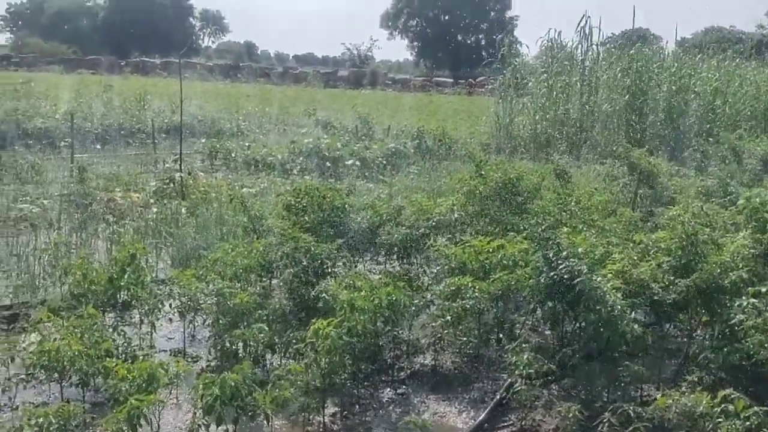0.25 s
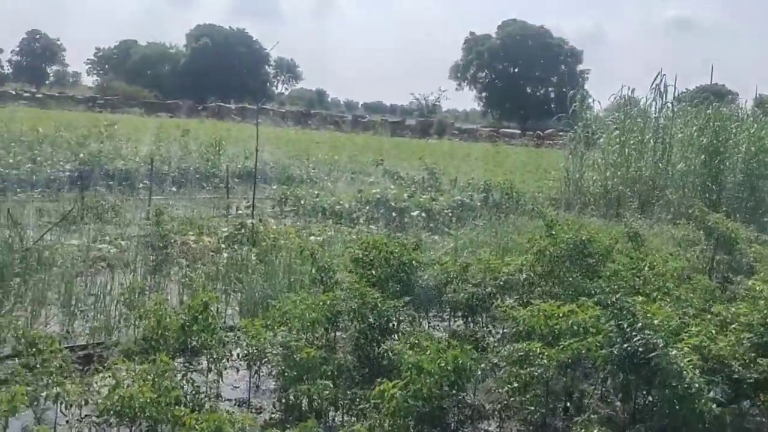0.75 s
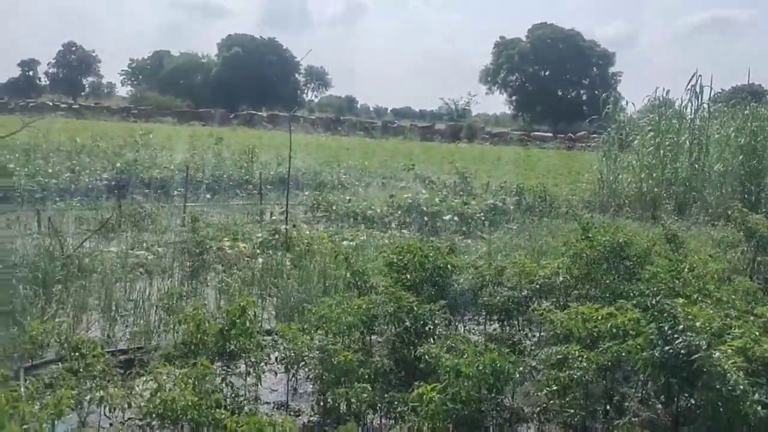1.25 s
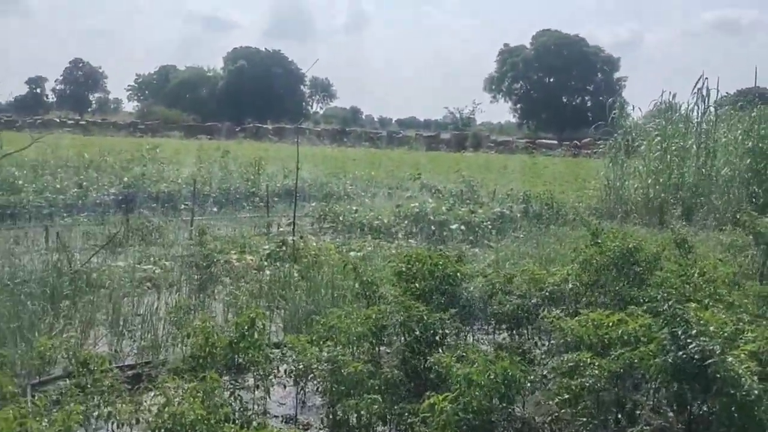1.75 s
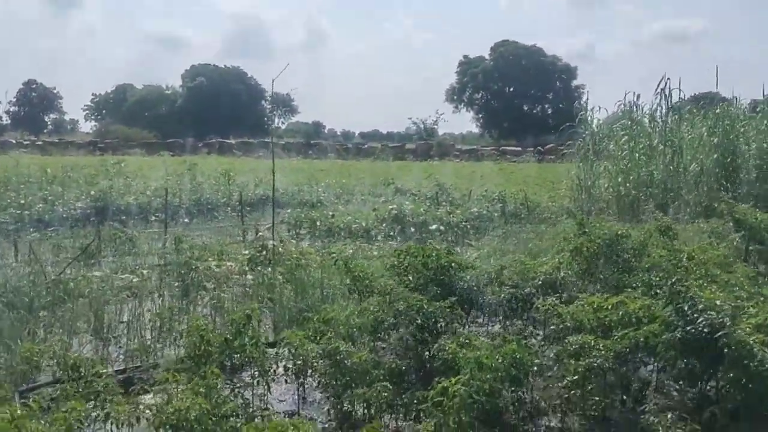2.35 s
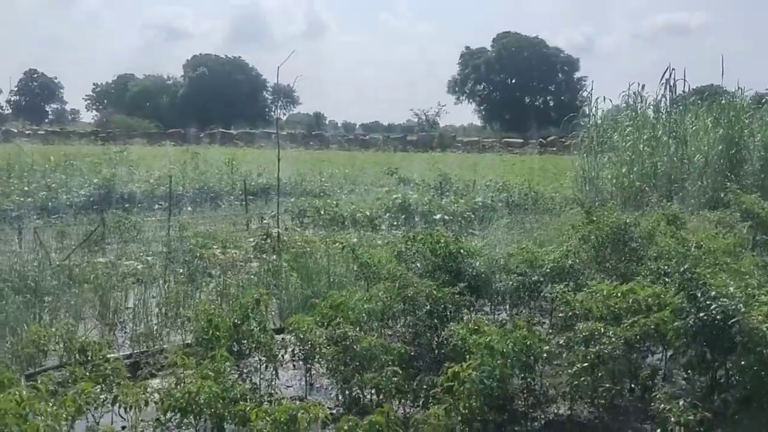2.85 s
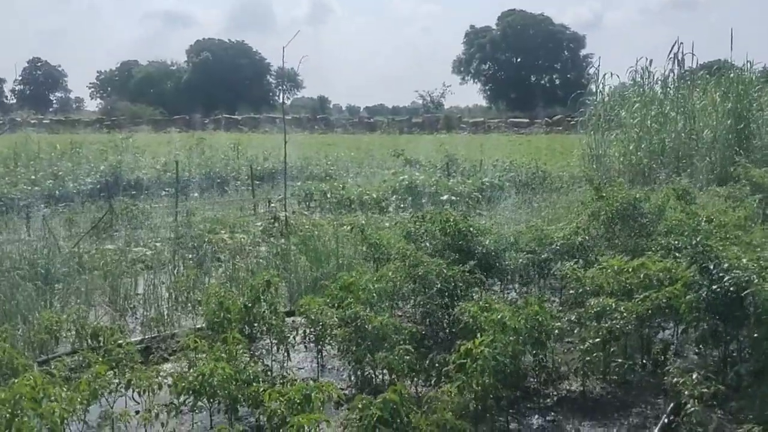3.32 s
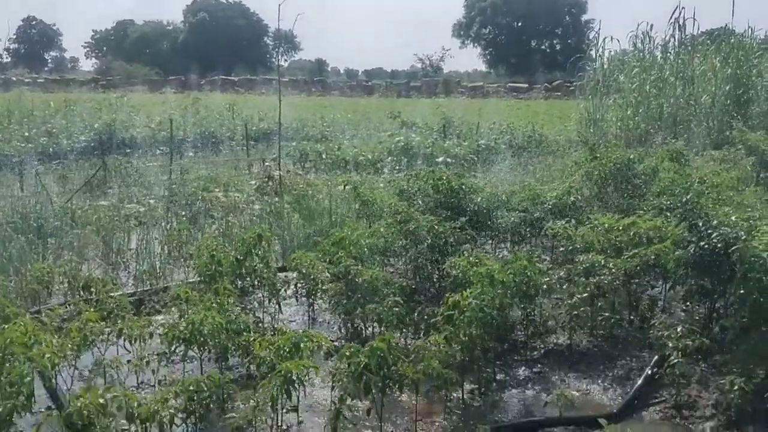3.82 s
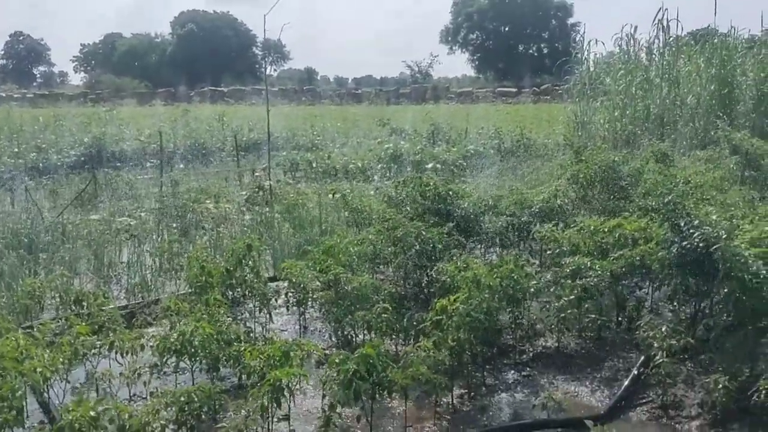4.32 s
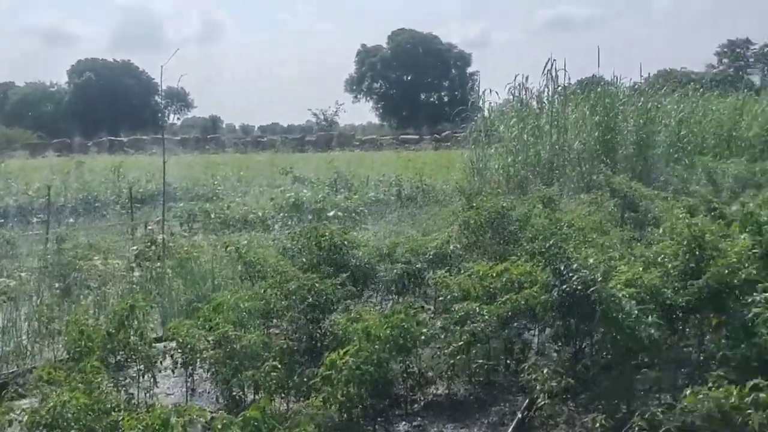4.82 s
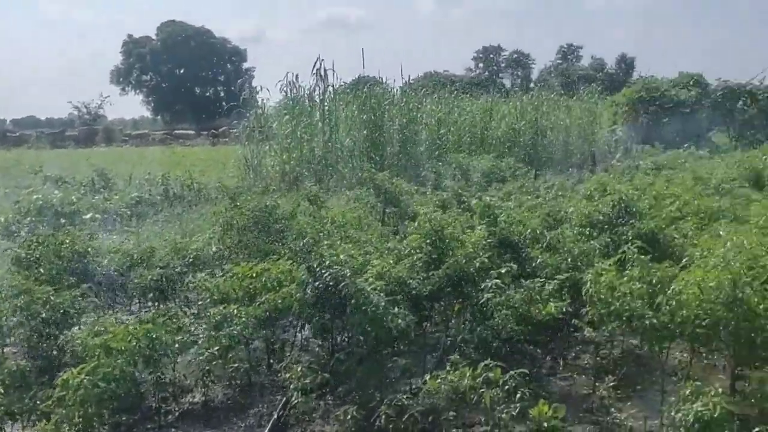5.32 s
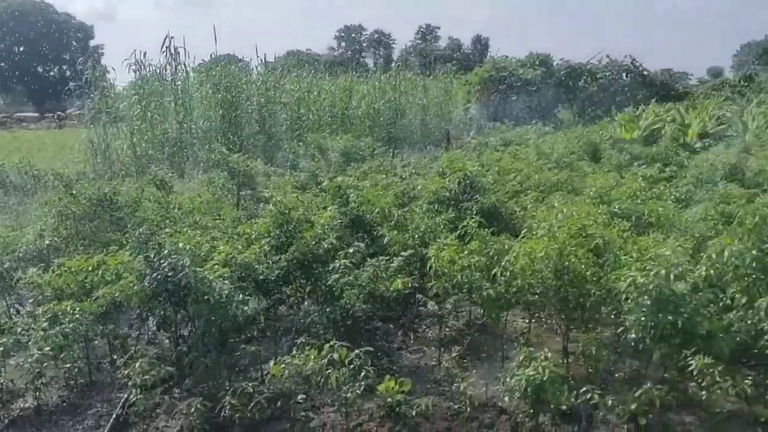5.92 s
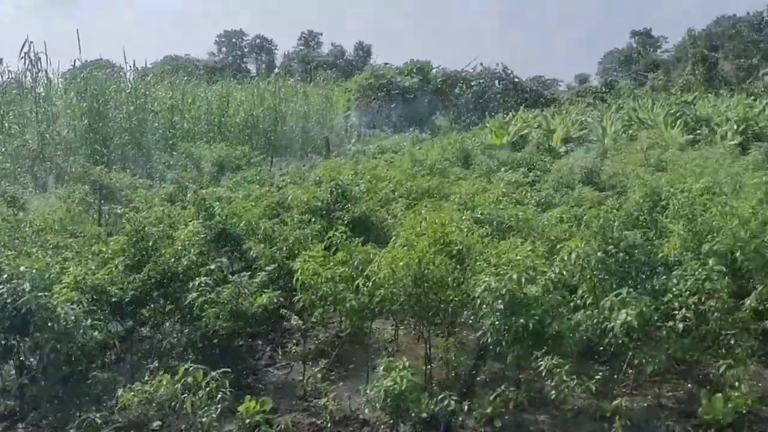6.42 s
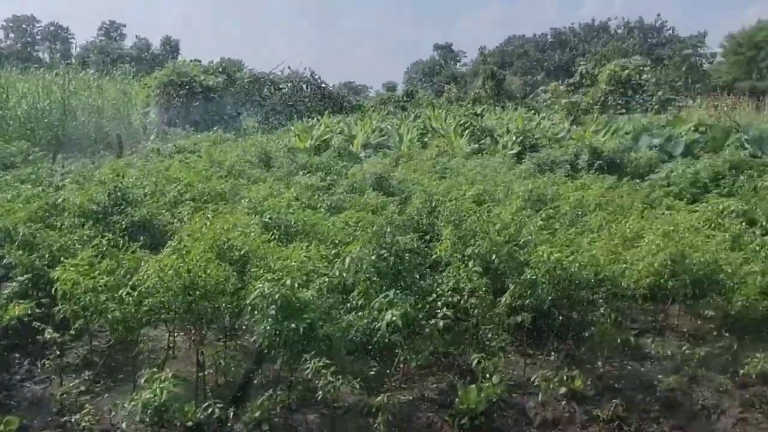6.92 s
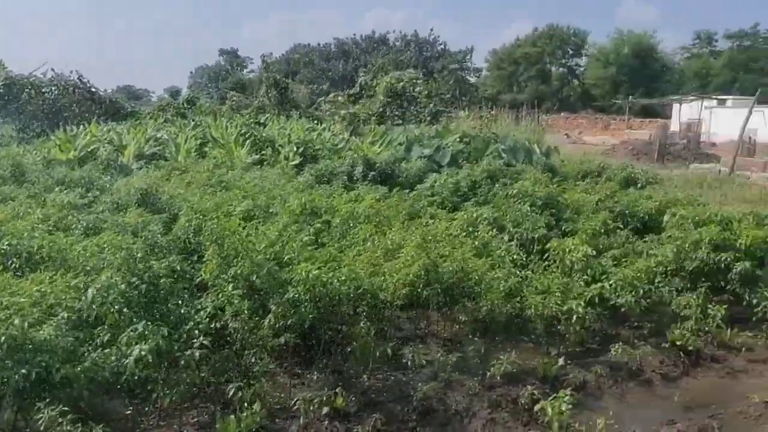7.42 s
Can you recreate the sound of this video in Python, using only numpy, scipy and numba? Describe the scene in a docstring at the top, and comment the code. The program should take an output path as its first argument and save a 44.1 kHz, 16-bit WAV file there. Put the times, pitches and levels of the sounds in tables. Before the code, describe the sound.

Water trickles, gurgles and splashes among plants in a flooded field while dull soft knocks bump the hand-held phone.

```python
"""Splashes stand out at once over water that trickles between the plants of a flooded field, on a hand-held phone.
Drops and bubbles ring pockets in the water and mud that keep opening and closing; they are swarms of fading sines
and noise cracks through drifting resonances. Each splash churns the water, which settles again.
Dull pushes knock the phone; as it turns, a fine spray of tiny pings on the leaves comes forward.
Far under the water lie a wavering low rumble, a faint hiss and the microphone's own hiss."""
import sys
import numpy as np
from scipy import signal
from scipy.fft import rfft, irfft
from scipy.io import wavfile
from scipy.ndimage import uniform_filter1d
from numba import njit

SR = 44100
rng = np.random.default_rng(int(sys.argv[2]) if len(sys.argv) > 2 else 0)


def file_out(sig):
    """Save sig as 16-bit WAV at sys.argv[1]."""
    # one column per channel
    cols = np.atleast_2d(sig).T
    # limit, then scale
    lim = np.clip(cols, -1, 1)
    pcm = np.round(lim * 32767).astype(np.int16)
    wavfile.write(sys.argv[1], SR, pcm)


N = 337806
TIME = np.arange(N) / SR

# Levels in the tables are relative: each source adds its own trim, and the phone shapes the sum.

# The calm flow between splashes. Each row: time in seconds, levels of gurgle, trickle and patter in dB.
FLOW = [(0.0, -67.5, -59, -59.5), (0.51, -66.5, -60, -59.5), (1.04, -72, -66, -55.5),
        (1.36, -66, -69.5, -57.5), (1.85, -67.5, -54.5, -53.5), (2.13, -60, -61.5, -62),
        (2.54, -72.5, -77, -62), (2.98, -76, -60, -72), (3.6, -63.5, -62.5, -72), (3.8, -61, -54.5, -58),
        (4.05, -70.5, -57.5, -69.5), (4.54, -63.5, -51.5, -60.5), (5.27, -80, -70, -49),
        (5.63, -68.5, -62.5, -59), (6.16, -67, -54, -49), (6.85, -74, -64.5, -57.5),
        (7.15, -65.5, -46.5, -50.5), (7.66, -99, -54, -44.5)]
# Resonant pockets of the deep gurgle. Each row: centre in Hz, width of each of two passes in Hz, level in dB.
GURGLE_POCKETS = [(471.6, 246, 5.5), (821, 400, -1.5)]
# Resonant pockets of the trickle. Each row: centre in Hz, width of each of two passes in Hz, level in dB.
TRICKLE_POCKETS = [(1139, 267, -5), (1553, 263, 2.5), (1983, 644, 2.5)]
# Resonant pockets of the patter. Each row: centre in Hz, width of each of two passes in Hz, level in dB.
PATTER_POCKETS = [(2522, 234, -5), (2924, 270, 1.5), (3422, 170, 1), (3860, 280, -2.5), (4276, 273, -4)]
# Finest drops of the patter. Each row: time in seconds, level in dB.
FIZZ = [(0.0, -55), (0.3, -65), (0.65, -82), (1.8, -77.5), (2.5, -83), (4.3, -83), (5.3, -73), (5.6, -69),
        (6.1, -76), (6.55, -65), (6.7, -47), (7.15, -70), (7.66, -67)]
# Splashes. Each row: start in seconds, level in dB, pitch of the main bubble in Hz,
# wash after it in dB relative to that level.
SPLASHES = [(0.049, -34, 4540, -40), (0.0905, -32, 4190, -14.5), (0.183, -31.5, 1724, -10.5),
            (0.3528, -36, 2810, -12), (0.5202, -33, 1330, -40), (0.6214, -44.5, 1470, -5.5),
            (0.7931, -34, 4000, -16), (0.9194, -32, 2920, -14), (0.9476, -31, 3850, -15.5),
            (1.5008, -29.5, 1470, -16), (1.7487, -35.5, 1395, -17.5), (1.825, -32.5, 3080, -22),
            (1.866, -37, 1054, -20), (1.906, -37, 1740, -16.5), (1.9285, -32.5, 3000, -16.5),
            (1.988, -34.5, 1270, -22), (2.0035, -37, 1265, -23), (2.2756, -39.5, 1820, -8.5),
            (2.5553, -37, 1020, -14.5), (2.7065, -34, 1010, -12.5), (2.7204, -36, 3210, -24),
            (2.827, -37.5, 3300, -28), (2.831, -26.5, 1515, -22), (2.8484, -25.5, 1093, -16.5),
            (2.8856, -35.5, 1450, -16), (3.03, -38.5, 1540, -13), (3.1676, -31, 1510, -23),
            (3.169, -41, 3130, -21), (3.272, -27.5, 1500, -13.5), (3.3, -50, 2550, -2.5),
            (3.375, -35.5, 1144, -16), (3.598, -32.5, 1066, -9), (3.6146, -29, 1760, -16),
            (3.6719, -37.5, 2080, -5.5), (3.6746, -39.5, 4360, -16), (3.712, -36.5, 2070, -30),
            (3.8704, -33.5, 1445, -19), (3.9315, -31, 4110, -18), (4.115, -37.5, 1500, -8),
            (4.1403, -31.5, 1840, -24), (4.1932, -29.5, 1420, -16), (4.215, -39, 3030, -13.5),
            (4.2625, -32, 1080, -14.5), (4.4212, -34, 2016, -9.5), (4.4643, -29, 1445, -26),
            (4.468, -40, 3460, -23), (4.509, -29.5, 820, -39), (4.5524, -42.5, 1690, 0),
            (4.6235, -31, 1934, -7.5), (4.627, -42, 3400, -23), (4.6826, -31, 1960, -14),
            (4.7517, -30, 2100, -19), (4.8276, -35, 2700, -17), (4.8845, -38.5, 2750, -36),
            (4.9551, -27.5, 2060, -20.5), (5.0335, -35.5, 2580, -10.5), (5.1215, -35, 918, -3.5),
            (5.1817, -29.5, 3380, -11), (5.2815, -32, 2250, -19.5), (5.285, -31.5, 3960, -20),
            (5.44, -36, 3140, -8), (5.5747, -31.5, 933, -13.5), (5.696, -31.5, 1370, -20.5),
            (5.796, -25.5, 3330, -11), (5.8286, -26.5, 3560, -27), (5.8602, -29.5, 3170, -21),
            (5.909, -33, 3080, -17), (6.058, -30, 1336, -16), (6.0771, -29, 2570, -16),
            (6.113, -29.5, 2120, -20), (6.224, -33, 1380, -29), (6.3031, -29.5, 2460, -7.5),
            (6.6208, -22.5, 4240, -17), (6.636, -37, 1250, -19), (6.6907, -30, 4420, -8.5),
            (6.88, -33, 4520, -13), (6.978, -30, 1670, -16.5), (7.092, -33.5, 1830, -15.5),
            (7.224, -34.5, 1470, -21), (7.3317, -21.5, 1114, -17.5), (7.345, -30, 2440, -6.5),
            (7.3996, -31, 1870, -17), (7.4475, -33, 1910, -14.5), (7.4958, -34, 990, -8.5),
            (7.5672, -27.5, 2440, -19.5)]
# Big bubbles. Each row: start in seconds, level in dB, pitch at the start in Hz.
PLOPS = [(1.318, -44, 398), (1.542, -47, 450), (1.835, -45, 424), (2.004, -45.5, 433), (2.083, -49, 410),
         (2.549, -46.5, 400), (2.913, -39.5, 460), (3.143, -45, 390), (4.129, -45.5, 494),
         (4.553, -38, 585), (4.85, -43, 350), (4.944, -39.5, 420), (5.124, -33.5, 483), (2.978, -47, 386),
         (3.158, -50, 398), (3.196, -48.5, 465), (5.578, -48, 497), (5.931, -50.5, 420), (6.007, -48, 410),
         (6.491, -43, 546), (6.967, -41, 410), (7.079, -51.5, 303), (7.185, -50.5, 420),
         (7.373, -48.5, 412), (7.399, -40, 386), (7.524, -45.5, 492)]
# Single drops striking leaves. Each row: start in seconds, level in dB, nominal pitch in Hz.
LEAF_TICKS = [(0.215, -57, 9500), (1.043, -56, 9050), (1.591, -57, 8750), (1.825, -52.5, 10500),
              (2.0587, -44.5, 10200), (2.104, -53, 9900), (4.747, -31, 12100), (4.797, -39, 10900),
              (4.946, -39, 11200), (5.036, -37, 11200), (5.723, -39.5, 10700), (5.794, -45, 10500),
              (5.843, -43, 9300), (6.078, -54, 11800), (6.6204, -44.5, 10000)]
# Tiny bright bubbles. Each row: start in seconds, level in dB, pitch in Hz.
PLINKS = [(1.3254, -64, 5110), (1.7569, -66, 4900), (2.2248, -65.5, 5380), (3.2849, -73, 4830),
          (4.122, -62.5, 5160), (5.284, -52, 4840), (5.591, -62.5, 4880), (5.8444, -54, 4800),
          (6.3021, -56.5, 5030), (6.624, -46, 4350)]
# Fine spray on the leaves, forward as the phone turns. Each row: time in seconds, level in dB,
# centre in Hz, level of its highest sizzle in dB.
SPRAY = [(0, -81, 8980, -90), (0.27, -86, 9360, -93), (0.38, -87.5, 10070, -100), (3.9, -99, 9920, -100),
         (4.35, -85, 10600, -88), (4.62, -74, 11400, -64), (4.72, -72, 10400, -79),
         (4.85, -69.5, 10730, -85), (5.19, -66.5, 11180, -76), (5.33, -69.5, 10600, -83),
         (5.52, -68, 10500, -59), (5.65, -77.5, 11300, -70), (6.04, -66, 11340, -84),
         (6.2, -71, 11700, -73), (6.53, -76, 10820, -87), (6.68, -78, 10200, -66.5),
         (7.35, -68.5, 10260, -71.5), (7.66, -73.5, 10260, -72)]
# Dull knocks on the phone. Each row: start in seconds, level in dB, nominal pitch in Hz.
KNOCKS = [(0.308, -32, 175), (0.361, -32.5, 106), (0.387, -25.5, 129), (0.457, -15.5, 159),
          (0.501, -24.5, 152), (0.629, -29, 107), (0.659, -26, 104), (1.429, -36.5, 162),
          (1.47, -38.5, 135), (1.575, -39, 149), (1.664, -36.5, 149), (2.164, -33.5, 250),
          (2.28, -26.5, 161), (2.368, -25, 140), (2.458, -40, 87), (3.737, -36.5, 128), (3.806, -21, 169),
          (3.953, -33, 133), (4.398, -13, 173), (4.5, -22, 165), (4.513, -28, 101), (4.537, -31, 172),
          (4.847, -38, 143), (5.141, -12.5, 175), (5.154, -27.5, 250), (5.172, -28, 134), (6.074, -41, 133),
          (6.979, -33, 212), (7.551, -33, 302)]
# Low rumble of air and hand. Each row: time in seconds, level in dB.
RUMBLE = [(0.0, -86), (0.53, -78), (1.0, -90), (1.19, -84), (1.54, -74), (1.92, -81), (2.35, -69),
          (2.69, -90), (3.41, -88), (3.75, -71.5), (4.1, -85.5), (5.16, -80.5), (5.7, -90), (7.66, -82)]
# Colour of the steady background. Each row: frequency in Hz, relative level in dB.
HISS_COLOUR = [(25, -29.5), (150, -8.5), (420, 16), (750, -3), (1600, 9), (2500, 5.5), (3400, 3),
               (3800, -9), (4400, -4.5), (5200, -14.5), (10000, -22.5), (15500, -13)]
# Microphone response, with a deep hollow in the treble. Each row: frequency in Hz, gain in dB.
MIC = [(20, 7), (4400, -5), (5000, 1), (5800, -2), (6500, -1), (7200, -13), (8200, -3.5), (9400, -1.5),
       (11000, -2)]
# Colour of the microphone's own even hiss. Each row: frequency in Hz, relative level in dB.
MIC_HISS = [(100, -17), (4400, -0.5), (6000, -20), (7800, -10), (10000, -2), (12400, 3.5), (15500, -3.5)]

# a splash churns the water at once, mostly near its own pitch, and the water settles again
CHURN_RISE_S, SETTLE_S, CHURN_OCTAVES = 0.001, 0.066, 0.52
# the water keeps reshaping each pocket: shift as a share of its pitch, and how often
POCKET_SHIFT, RESHAPES_PER_S = 0.048, 8
SPRAY_FOLLOWS = 0.07  # share of the patter's surge, in dB, that the spray follows
LEAD_S = 0.012  # time that a splash or tick has to swell before its peak
TOP_HZ = 15550  # the phone cuts the treble above this


def running_water(sway_db=6.5, open_db=-18):
    """Deep gurgle, trickling bubbles and pattering drops ring the pockets and surge after each splash."""
    gurgle = bubbles(264.2, 935, cycles=1.064, spread_db=15, count=1400)
    gurgle = scatter(gurgle, tail_s=0.14, wet_db=-5.5)

    spits = unit(band(drops(contact_s=0.0049, spread_db=17.5, count=520), 974, 1950, order=4))
    trickle = bubbles(882.4, 2282, cycles=2.5, spread_db=25, count=1700) + undb(-0.5) * spits
    trickle = scatter(trickle, tail_s=0.11, wet_db=-0.5)

    slaps = unit(band(drops(contact_s=0.0035, spread_db=15, count=800), 2200, 4500, order=6))
    patter = slaps + undb(-2.5) * bubbles(2295.4, 4587, cycles=8, spread_db=17.5, count=1400)
    patter = scatter(patter, tail_s=0.22, wet_db=-3.5)

    # a little of each sound also reaches the microphone without ringing a pocket
    gurgle = pockets(gurgle, GURGLE_POCKETS, sway_db) + undb(open_db) * gurgle
    trickle = pockets(trickle, TRICKLE_POCKETS, sway_db) + undb(open_db) * trickle
    patter = pockets(patter, PATTER_POCKETS, sway_db) + undb(open_db) * patter

    gurgle_db = surge(curve(FLOW, axis=1), PLOPS, centre_hz=474, flow_db=5.5, churn_db=-13.5)
    trickle_db = surge(curve(FLOW, axis=2), wash_events(), centre_hz=1433, flow_db=-3.0, churn_db=-4.5)
    return stream(gurgle, gurgle_db) + stream(trickle, trickle_db) + stream(patter, patter_level())


def bubbles(low_hz, high_hz, cycles, spread_db, count):
    """A swarm of short-lived bubbles at random moments, most of them weak; each fades over a few cycles."""
    out = np.zeros(N)
    for when, size, strength, life in rng.random((count, 4)):
        hz = low_hz * (high_hz / low_hz) ** size
        fall_s = cycles / hz * 2 ** (2 * life - 1)
        t = np.arange(-3 * fall_s, 6 * fall_s, 1 / SR)
        ring = swell(t, fall_s / 2, fall_s) * np.sin(2 * np.pi * hz * t)
        add(out, when * N / SR, undb(spread_db * strength ** 3) * ring)
    return unit(out)


def drops(contact_s, spread_db, count):
    """Drops land at random moments, each a brief crack of noise, most of them weak."""
    power = np.zeros(N)
    when, strength = rng.random((count, 2)).T
    np.add.at(power, (when * N).astype(int), undb(spread_db * strength ** 3) ** 2)
    # two equal decays in a row round off each crack's start
    keep = np.exp(-2 / (contact_s * SR))
    for _ in range(2):
        power = signal.lfilter([1], [1, -keep], power)
    return unit(np.sqrt(power) * rng.standard_normal(N))


def pockets(x, modes, sway_db, rate=9):
    """Hollows ring with what falls in; each holds its pitch until reshaped, and opens and closes on its own."""
    out = np.zeros(N)
    for hz, width, db in modes:
        centre = hz * (1 + POCKET_SHIFT * held(RESHAPES_PER_S))
        once = resonate(x, centre, float(width))
        twice = resonate(once, centre, float(width))
        out += twice * undb(db + sway_db * walk(rate))
    return out


@njit
def resonate(x, hz, width):
    """State-variable band-pass with a moving centre, gain 1 there."""
    out, mid, low = np.empty(len(x)), 0., 0.
    for i in range(len(x)):
        g = np.tan(np.pi * hz[i] / SR)
        damping = np.pi * width / SR * (g + 1 / g)
        v = (mid + g * (x[i] + 1e-18 - low)) / (1 + g * (g + damping))
        mid = 2 * v - mid
        low = low + 2 * g * v
        out[i] = damping * v
    return out


def wash_events():
    """The wash of each splash as (s, dB, Hz)."""
    return [(s, db + wash_db, hz) for s, db, hz, wash_db in SPLASHES]


def patter_level():
    """Level in dB of the patter, surging with the washes."""
    return surge(curve(FLOW, axis=3), wash_events(), centre_hz=2920, flow_db=-5.0, churn_db=-8.0)


def surge(calm_db, events, centre_hz, flow_db, churn_db):
    """Level in dB of one part of the water: the calm flow plus what the events churn up."""
    calm_power = undb(calm_db + flow_db) ** 2
    churn_power = undb(churn_db) ** 2 * churn(events, centre_hz)
    return 10 * np.log10(calm_power + churn_power)


def churn(events, centre_hz):
    """Power that (s, dB, Hz) events stir up in the part of the water that sounds around centre_hz."""
    power = np.zeros(N)
    t = TIME[:SR // 2]
    envelope = (1 - np.exp(-t / CHURN_RISE_S)) * np.exp(-t / SETTLE_S)
    for s, db, hz in events:
        nearness = np.exp(-(np.log2(hz / centre_hz) / CHURN_OCTAVES) ** 2)
        add(power, s, nearness * (undb(db) * envelope) ** 2)
    return power


def stream(sound, level_db):
    """The flow carries a swarm at the given level; its running power is evened out so gaps stay filled."""
    x = unit(sound)
    running_power = uniform_filter1d(x ** 2, size=SR // 7)
    return undb(level_db) * x / np.sqrt(running_power + 0.072)


def fizz(fizz_db=-3):
    """The smallest drops fizz in one narrow band at the top of the patter."""
    fine = band(drops(contact_s=0.0048, spread_db=16, count=700), 4270, 4640, order=3)
    return stream(fine, curve(FIZZ) + fizz_db)


def splashes():
    """The splashes, plops and leaf ticks that stand out of the flow."""
    washes, rings, deep, ticks = np.zeros((4, N))
    for s, db, hz, wash_db in SPLASHES:
        wash, ring = splash(hz, wash_db, LEAD_S)
        add(washes, s - LEAD_S, undb(db) * wash)
        add(washes, s, undb(db - 17) * crack())
        add(rings, s - LEAD_S, undb(db - 9.5) * ring)
    for s, db, hz in PLOPS:
        add(deep, s, undb(db + 7.0) * bubble(hz, cycles=5.6, glide=0.025, birth=0.5))
    for s, db, hz in LEAF_TICKS:
        add(ticks, s - LEAD_S, undb(db - 11.5) * leaf_tick(hz))
    ringing = pockets(washes, TRICKLE_POCKETS + PATTER_POCKETS, sway_db=6)
    washes = undb(-3.0) * ringing + undb(-4.5) * washes
    deep = scatter(deep, tail_s=0.35, wet_db=-9.0)
    return washes + rings + deep + scatter(ticks, tail_s=0.25, wet_db=-12.0)


def splash(hz, wash_db, lead_s, cycles=14, count=4):
    """Water slaps the surface, traps one main bubble, and falls back as droplets over a fading wash."""
    t = TIME[:SR // 5] - lead_s - .0025
    low_hz, high_hz = 0.624 * hz, min(1.218 * hz, 4600)
    slap, wash = (unit(band(noise, low_hz, high_hz, order=6)) for noise in rng.standard_normal((2, len(t))))
    out = undb(-17.0) * slap * swell(t, 0.0041, 0.00025)
    out += undb(wash_db - 13.5) * wash * swell(t - .003, 0.0015, 0.041)
    for delay, size in rng.random((count, 2)):
        ping = bubble(hz * 1.178 ** (2 * size - 1), cycles, glide=0.056, birth=10.0)
        add(out, lead_s + delay * .05, undb(wash_db - 2.5 - 5.9 * delay) * ping)
    main_bubble = swell(t, 0.0016, 0.002) * np.sin(2 * np.pi * hz * t)
    return out, main_bubble


def crack():
    """The soft crack of water meeting water."""
    return burst(900, 3600, rise_s=.001, fall_s=.0025)


def burst(low_hz, high_hz, rise_s, fall_s):
    """A band of noise that swells quickly and dies away."""
    t = TIME[:SR // 5]
    envelope = (1 - np.exp(-(t / rise_s) ** 2)) * np.exp(-t / fall_s)
    return unit(band(rng.standard_normal(len(t)), low_hz, high_hz, order=4)) * envelope


def bubble(hz, cycles, glide, birth=0.59):
    """An air bubble pinches off, rings down and, with any glide, rises in pitch as it nears the surface."""
    turn = np.arange(int(cycles * SR / hz) + 2) * hz / SR
    envelope = (1 - np.exp(-(turn / birth) ** 2)) * np.exp(-np.log(300) * turn / cycles)
    phase = 2 * np.pi * turn * (1 + glide * turn / cycles / 2)
    return envelope / envelope.max() * np.sin(phase)


def leaf_tick(hz):
    """A drop spreads on a leaf with a brief, bright tick."""
    t = TIME[:SR // 10] - LEAD_S
    noise = unit(band(rng.standard_normal(len(t)), .85 * hz, 1.12 * hz, order=4))
    return noise * swell(t - .004, .002, .0028)


def plinks(plink_db=5):
    """Tiny bubbles ping above the patter and linger among the stems."""
    out = np.zeros(N)
    for s, db, hz in PLINKS:
        add(out, s, undb(db + plink_db) * droplet(hz, fall_s=0.0046))
    return scatter(out, tail_s=0.46, wet_db=-5)


def droplet(hz, fall_s):
    """A tiny bubble pings at one steady pitch."""
    t = TIME[:SR // 30]
    envelope = (1 - np.exp(-(t / 0.00049) ** 2)) * np.exp(-t / fall_s)
    return envelope * np.sin(2 * np.pi * hz * t)


def spatter(spatter_db=23, crack_db=25, scatter_db=3, flight_s=0.054, count=12):
    """Each splash cracks and flicks droplets onto the leaves in turn, heard as far as the spray is."""
    out = np.zeros(N)
    for s, db, hz, wash_db in SPLASHES:
        add(out, s, undb(db + crack_db) * burst(4800, 15000, rise_s=.003, fall_s=.006))
        for delay, size, strength in rng.random((count, 3)):
            ping = droplet(4700 * (10500 / 4700) ** size, fall_s=0.0062)
            ping_db = db + spatter_db + scatter_db * (2 * strength - 3.5)
            add(out, s + flight_s * delay ** 2, undb(ping_db) * ping)
    return scatter(out, tail_s=0.083, wet_db=7) * undb(curve(SPRAY))


def spray():
    """Mist sizzles on the wet leaves; the smallest droplets make a higher sizzle above it."""
    thrown_db = SPRAY_FOLLOWS * (patter_level() - curve(FLOW, axis=3))
    leaves = mist(curve(SPRAY, axis=2), octaves=0.15, spread_db=21, count=3400)
    sizzle = mist(np.full(N, 13900), octaves=0.13, spread_db=21, count=2400)
    leaves_db = surge(curve(SPRAY) + thrown_db, LEAF_TICKS, centre_hz=11300, flow_db=5.5, churn_db=-23.0)
    sizzle_db = curve(SPRAY, axis=3) + thrown_db - 0.5
    return stream(leaves, leaves_db) + stream(sizzle, sizzle_db)


def mist(centre_hz, octaves, spread_db, count):
    """Many tiny droplets land at uneven strength, each with a ping of its own pitch near the centre."""
    out, cluster = np.zeros(N), undb(2.5 * walk(35))
    for when, pitch, strength in rng.random((count, 3)):
        i = int(when * N)
        ping = droplet(centre_hz[i] * 2 ** (octaves * (2 * pitch - 1)), fall_s=.0025)
        add(out, i / SR, cluster[i] * undb(spread_db * strength ** 4) * ping)
    return scatter(out, tail_s=0.2, wet_db=1)


def knocks(case_hz=390, case_db=-24):
    """Each knock is one soft push on the phone; the hand shudders and the case hums briefly."""
    out, lead_s = np.zeros(N), .016
    t = TIME[:SR // 10] - lead_s
    for s, db, hz in KNOCKS:
        swing = (np.pi * .92 * hz * t) ** 2
        push = (1 - 2 * swing) * np.exp(-swing)
        shudder = unit(band(rng.standard_normal(len(t)), 110, 216)) * swell(t - .003, 0.0018, 0.0059)
        add(out, s - lead_s, undb(db - 4.5) * (push + undb(-15.0) * shudder))
        add(out, s, undb(db + case_db) * bubble(case_hz, cycles=7.8, glide=0))
    return band(out, 58, 3300)


def background():
    """A wavering low rumble of air and hand, and a faint, even hiss."""
    waver_db = 4 * walk(22)
    rumble = unit(band(rng.standard_normal(N), 67, 238)) * undb(curve(RUMBLE) + waver_db + 13.0)
    hiss = undb(-75.5) * unit(colour(rng.standard_normal(N), HISS_COLOUR))
    return rumble + hiss


def scatter(x, tail_s, wet_db):
    """Stems and wet ground throw the sound back as a short, diffuse tail."""
    t = TIME[:SR // 3]
    tail = rng.standard_normal(len(t)) * np.exp(-np.log(1000) * t / tail_s)
    return x + undb(wet_db) * signal.fftconvolve(x, tail / np.linalg.norm(tail))[:N]


def swell(t, rise, fall):
    """Grows exponentially towards t = 0 and dies away after it; top 1."""
    envelope = np.exp(-np.logaddexp(-t / rise, t / fall))
    return envelope / envelope.max()


def walk(rate):
    """Slow chance: random levels, rate per second, joined by lines; rms near 1."""
    return np.sqrt(3 / 2) * np.interp(TIME * rate, np.arange(2048), rng.standard_normal(2048))


def held(rate):
    """Chance in steps: each random level holds for 1 / rate s on average, then quickly gives way."""
    step = np.cumsum(rng.random(N) < rate / SR)
    return uniform_filter1d(rng.standard_normal(2048)[step % 2048], size=SR // 80)


def undb(db):
    """Decibels to gain."""
    return 10 ** (np.asarray(db) / 20)


def curve(table, axis=1):
    """One column of a table, joined by straight lines in time."""
    rows = np.array(table)
    return np.interp(TIME, rows[:, 0], rows[:, axis])


def unit(x):
    """Scale to rms 1."""
    return x / np.sqrt(np.mean(x ** 2))


def add(out, start_s, x):
    """Mix a short sound into a track."""
    i = int(np.clip(start_s * SR, 0, N - 1))
    out[i:i + len(x)] += x[:N - i]


def band(x, low_hz, high_hz, order=2):
    """Band-pass between two edges."""
    edges = [low_hz, min(high_hz, SR / 2 - 100)]
    return signal.sosfilt(signal.butter(order, edges, "band", fs=SR, output="sos"), x)


def colour(x, points, size=2048):
    """Causal filter through (Hz, dB) points, built from the cepstrum."""
    hz, db = np.transpose(points)
    grid = np.maximum(np.fft.rfftfreq(size, 1 / SR), 1)
    cepstrum = irfft(np.log(undb(np.interp(np.log(grid), np.log(hz), db))))
    # folding the cepstrum forward in time gives minimum phase
    cepstrum[1:size // 2] *= 2
    cepstrum[size // 2 + 1:] = 0
    return signal.fftconvolve(x, irfft(np.exp(rfft(cepstrum))))[:len(x)]


def suppress(x, threshold_db=-8.5, depth_db=-8, size=768):
    """Noise suppressor: whatever does not stand above the average of its neighbourhood is turned down."""
    overlap = size * 3 // 4
    spectra = signal.stft(x, nperseg=size, noverlap=overlap)[2]
    power = abs(spectra) ** 2 + 1e-20
    # usual power: log average over nearby frames and frequencies
    usual = np.exp(uniform_filter1d(uniform_filter1d(np.log(power), size=70, axis=1), size=15, axis=0))
    present = uniform_filter1d(power, size=5, axis=1) + 1e-20
    opening = 1 / (1 + (undb(threshold_db) ** 2 * usual / present) ** 2)
    return signal.istft(spectra * undb(depth_db * (1 - opening)), nperseg=size, noverlap=overlap)[1][:N]


def scene():
    """The whole field, in one channel."""
    water = running_water() + fizz() + splashes() + plinks()
    leaves = spatter() + spray()
    return (water + leaves + knocks() + background())[None]


def record(dry):
    """The phone suppresses steady noise, adds its own colour and faint hiss, and cuts the top."""
    hiss = undb(-83.5) * unit(colour(rng.standard_normal(N), MIC_HISS))
    heard = np.array([colour(suppress(x), MIC) + hiss for x in dry])
    return signal.sosfilt(signal.ellip(10, .2, 70, TOP_HZ, fs=SR, output="sos"), heard)


dry = scene()
out = record(dry)
file_out(out)
```